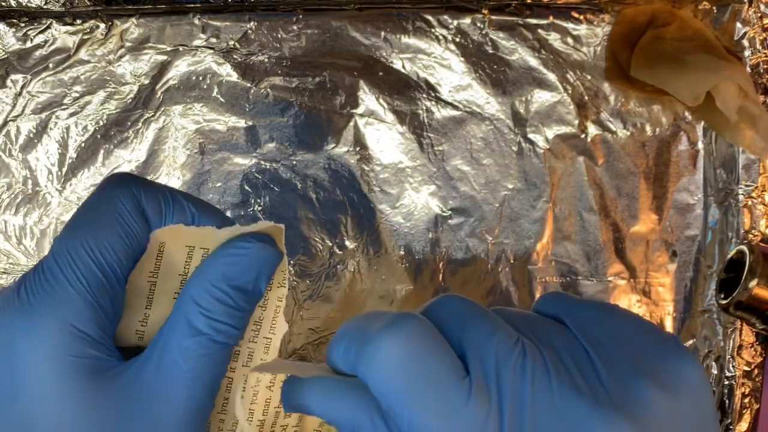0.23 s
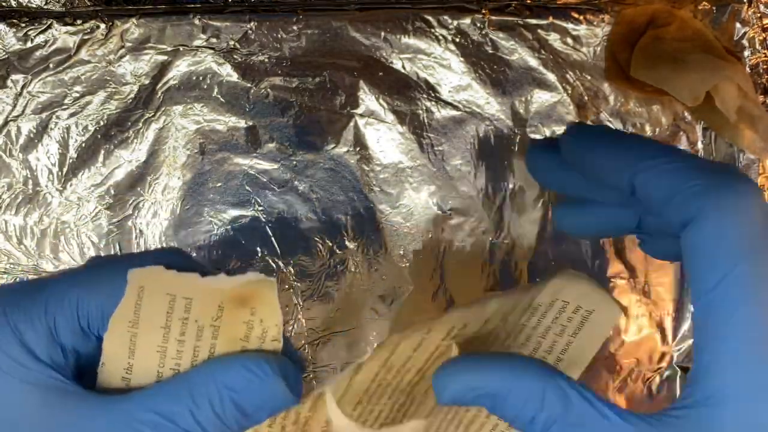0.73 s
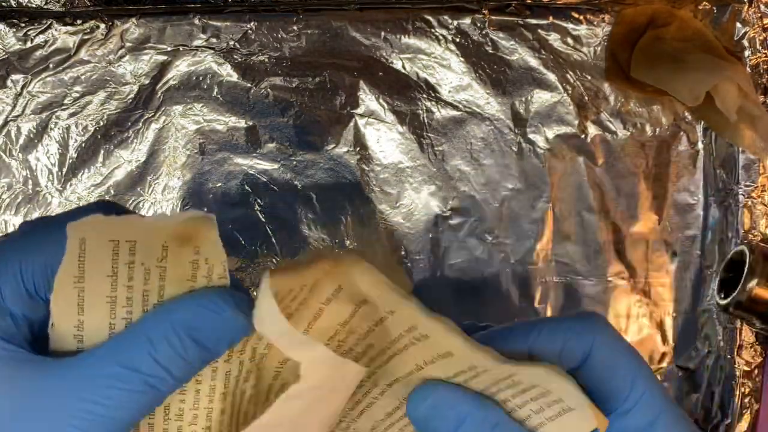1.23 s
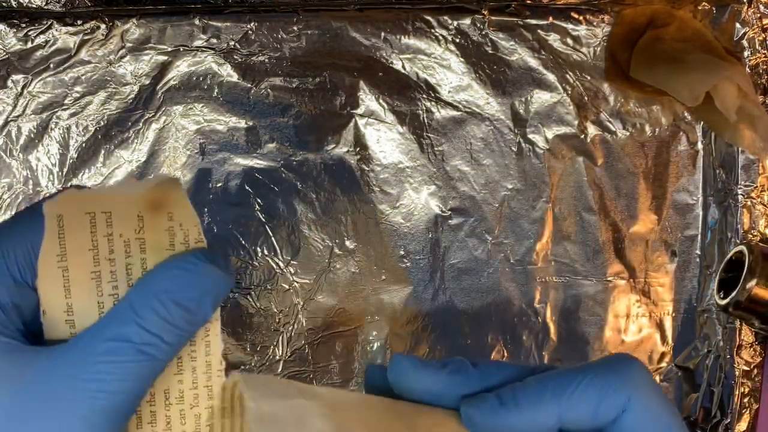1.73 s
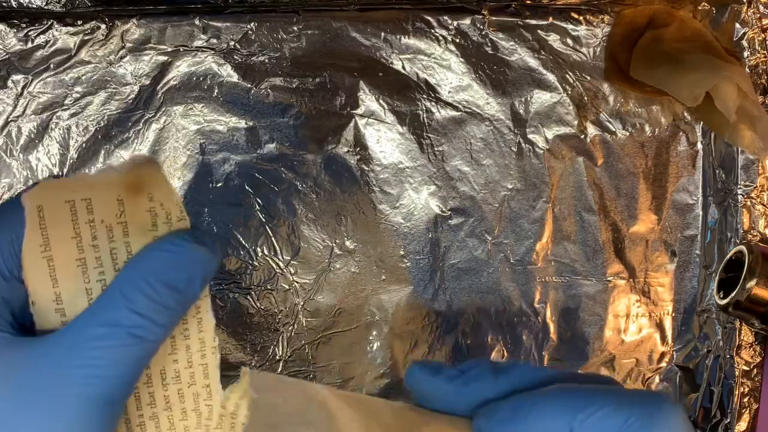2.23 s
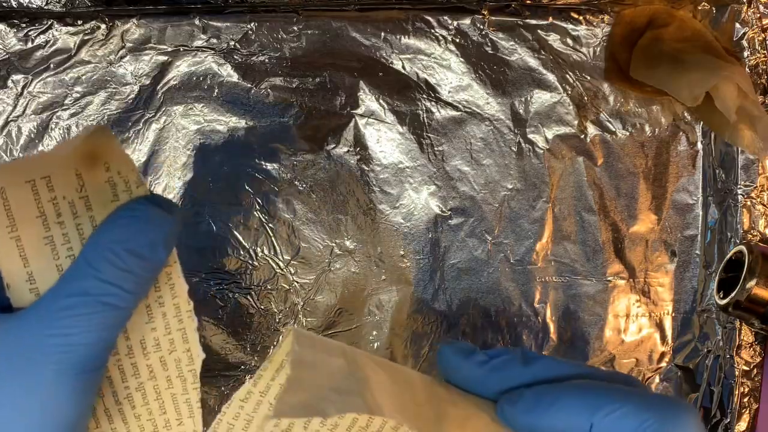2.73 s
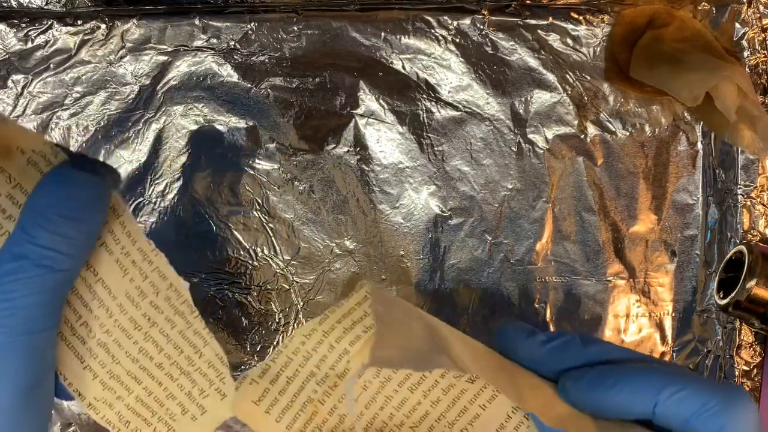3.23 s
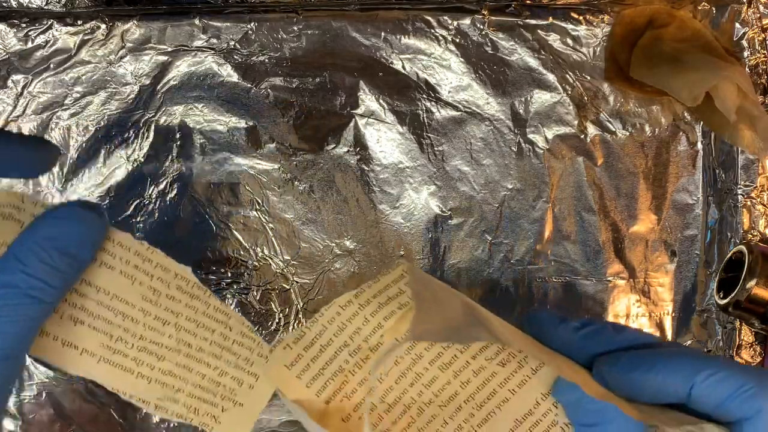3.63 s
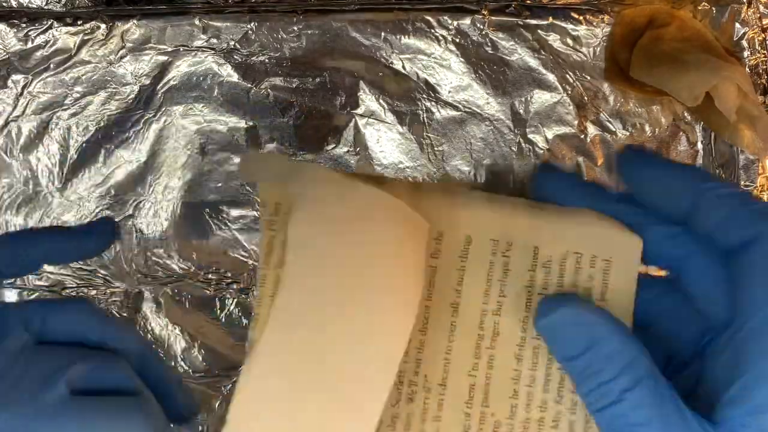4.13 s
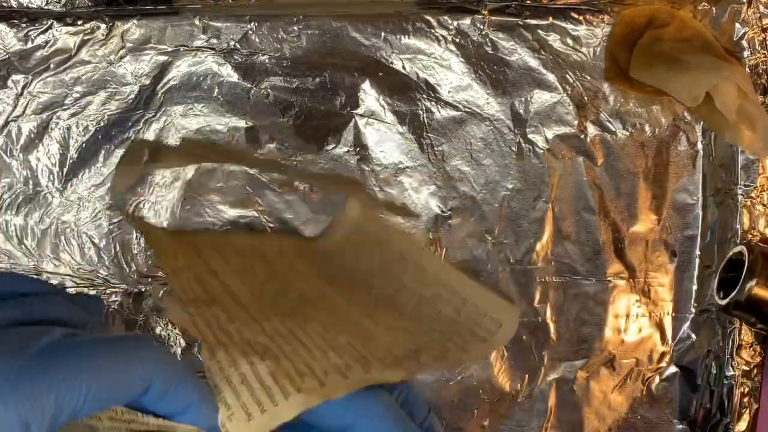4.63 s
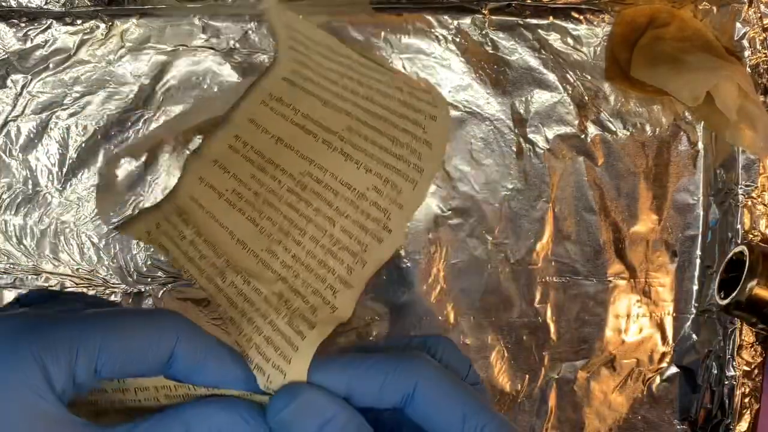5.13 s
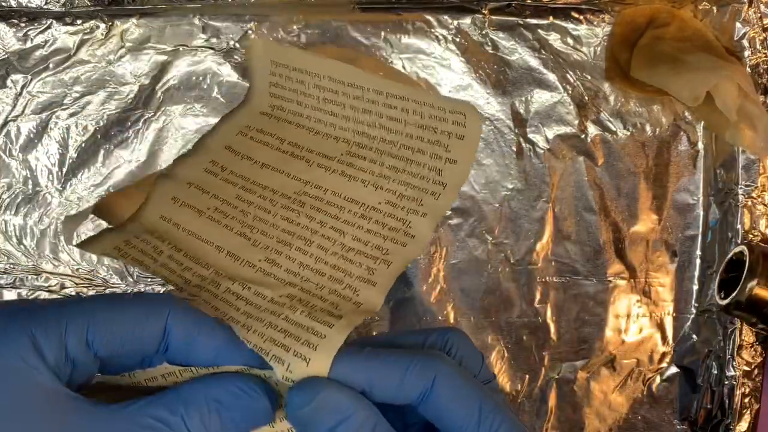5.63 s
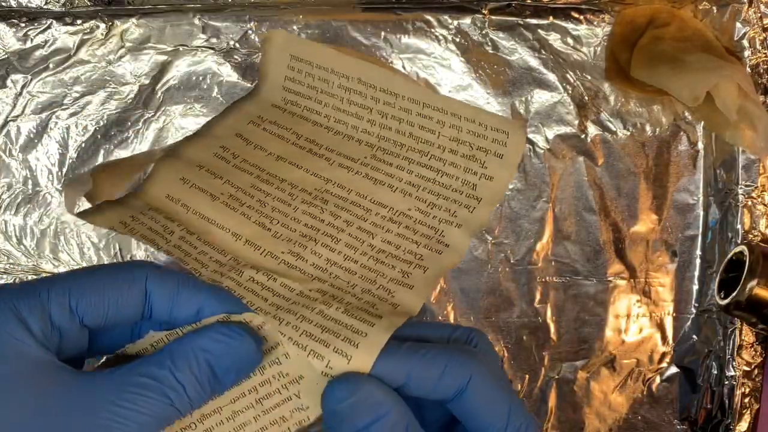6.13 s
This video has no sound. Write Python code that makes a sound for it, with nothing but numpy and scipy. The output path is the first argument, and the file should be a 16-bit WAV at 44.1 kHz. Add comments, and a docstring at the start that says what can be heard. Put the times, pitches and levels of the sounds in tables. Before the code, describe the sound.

Gloved hands tear a brittle old book page close to the microphone in a small quiet room. A short dry rip opens, then busy rustling and crisp snaps of the buckling sheet, with further brief rips between and soft low puffs of moved air. After the page is turned over, activity thins and a quiet, muffled slow tear crackles to the end.

```python
"""A short dry rip opens the scene: gloved hands tear an old book page above a foil-lined tray, close by.
Five such rips are loud bursts of coarse, unclumped grains of breaking fibre; denser, clumpier grains rustle.
Buckling panels snap as noise bursts with two ringing modes, and low filtered noise makes puffs of air.
Near the end the pinched page tears slowly and softly, in sparser grains than the rustle.
The paper sounds in a hollow and a small quiet room; two microphone ports hear it with the air and background."""
import sys
import numpy as np
from scipy import signal
from scipy.fft import rfft, irfft, next_fast_len
from scipy.io import wavfile
from scipy.ndimage import uniform_filter1d

SR = 44100
rng = np.random.default_rng(int(sys.argv[2]) if len(sys.argv) > 2 else 0)


def waveform_to_disk(signal):
    """Save audio, clipped to [-1, 1], as 16-bit WAV at the path in sys.argv[1]."""
    frames = np.transpose(np.atleast_2d(signal))
    scaled = np.clip(frames, -1, 1) * 32767
    samples = np.round(scaled).astype(np.int16)
    wavfile.write(sys.argv[1], SR, samples)


N = 281799

# The sheet buckles, each time in a different panel; levels are relative, ahead of the mix:
# start_s [s], level_db [dB], body_db [dB], sizzle_db [dB], low_mode_hz [Hz], upper_mode_hz [Hz]
BUCKLES = [(.131, -44.5, 7, 0, 695, 1670), (0.1497, -37.5, 7, -17, 415, 1700),
           (0.2168, -29.5, -2.5, -11, 765, 1620), (0.306, -33.5, -14, 5.5, 880, 1660),
           (.332, -11.5, -6, -1, 435, 1810), (0.349, -24.5, 9, 1, 950, 1740),
           (0.441, -34, 4, 5.5, 312, 2580), (0.5257, -21.5, -23, -10, 725, 1730),
           (.545, -26, -5, 7.5, 430, 1740), (0.5799, -18, -14, 8, 940, 2170),
           (0.5927, -19.5, 0.5, -5, 720, 2180), (0.6598, -42, -21, 16, 392, 2200),
           (.865, -58.5, -4, 15.5, 400, 3040), (0.9366, -36.5, -16, 6.5, 300, 3400),
           (1.0114, -43.5, -16, 3, 300, 3020), (1.164, -26, -16, 4.5, 820, 2900),
           (1.185, -13, -1, -3, 786, 1800), (1.205, -21.5, -9, 4, 440, 2950),
           (1.2205, -12, 4, 0, 1170, 2180), (1.3191, -24.5, 11.5, 0, 403, 2900),
           (1.3563, -25, -6.5, 8, 600, 1630), (1.4113, -25.5, -1, 5.5, 750, 1760),
           (1.5364, -50, 18.5, 15, 415, 1710), (1.5589, -42, 16, 7, 355, 1650),
           (1.5893, -32.5, 12, -3, 627, 1580), (1.6055, -38, -10, 12, 640, 3340),
           (1.6295, -36.5, -7, 16, 860, 3430), (1.6546, -18, -5, 10, 1085, 1660),
           (1.6678, -29.5, -11, 16, 930, 2220), (1.7629, -33.5, 5, 8, 427, 1560),
           (1.7967, -26.5, 0, -16, 970, 1700), (1.844, -39.5, 5.5, -0.5, 298, 1770),
           (1.914, -31.5, 5, -6.5, 326, 1870), (1.9631, -34.5, 13.5, -17, 1010, 2960),
           (2.002, -12.5, -2.5, -10, 380, 3090), (2.0313, -26, 6.5, -13, 450, 1720),
           (2.072, -27, 3.5, -4, 427, 1610), (2.092, -18, 1, 0, 445, 1800),
           (2.1598, -17.5, 6, 5.5, 393, 1630), (2.189, -20.5, -4, -6, 428, 1750),
           (2.222, -30, -14, 17, 726, 1860), (2.2492, -28, -3, 8, 380, 2120),
           (2.2753, -25, 10, 12, 463, 2100), (2.3448, -26, 5, -5.5, 930, 1660),
           (2.569, -30, 3.5, 9, 750, 1840), (2.6368, -23.5, 7, 6.5, 308, 1730),
           (2.6606, -21, -2, 5.5, 407, 1680), (2.8048, -38, -4, 10, 300, 1930),
           (2.826, -34, 9.5, 11, 314, 1680), (2.8478, -21.5, -1, -3, 413, 1610),
           (2.8746, -15.5, -1, -1.5, 390, 2000), (2.935, -29, 10.5, -4.5, 863, 1820),
           (2.9926, -39, 10, 16, 930, 3080), (3.1266, -25.5, 1.5, 4, 398, 1870),
           (3.1669, -31, 11.5, 8, 404, 1470), (3.196, -34, 9, 8.5, 395, 2440),
           (3.3294, -49, 6, 8.5, 845, 3100), (3.4431, -19.5, -6, -16, 975, 2140),
           (3.5913, -40.5, 7, -16, 895, 1730), (3.612, -34.5, 6, -17.5, 835, 1920),
           (3.7922, -45.5, 12, 4, 710, 4800), (3.8112, -42, 5, 3.5, 372, 2800),
           (3.86, -42.5, 9, 4.5, 700, 2870), (3.892, -30.5, 10.5, 7, 764, 2640),
           (4.008, -18.5, -8, 1.5, 687, 4140), (4.0344, -19, 0, 5.5, 380, 3920),
           (4.0617, -24, -2.5, -14, 680, 1620), (4.1567, -19, -9, -1, 935, 2060),
           (4.2294, -35, -15, 10.5, 890, 3530), (4.2847, -31, 0, 8, 1130, 3600),
           (4.45, -27, -9.5, 5.5, 677, 1360), (4.5266, -37, 6.5, -19, 700, 1400),
           (4.5458, -14.5, -3, -9.5, 608, 1350), (4.571, -34.5, -11.5, 21, 720, 1850),
           (4.6063, -27, -6, 2, 620, 4670), (4.72, -37, -8, -1.5, 318, 2100),
           (4.8204, -46, 5.5, -14, 630, 1530), (5.1035, -19, 0, -7.5, 960, 2120),
           (5.2381, -45, -10, 2, 960, 2180), (5.364, -48, -18, -12, 915, 2120),
           (5.4183, -37, -8, 2.5, 640, 1880), (5.8307, -37, -8, -15, 966, 1800),
           (6.03, -37, -5, -21, 940, 2120), (6.1166, -42.5, 13, 16.5, 674, 1730)]


def gain_of(db):
    """Decibels to amplitude."""
    return 10 ** (np.asarray(db) / 20)


def evened(x):
    """Scales to rms 1."""
    return x / np.sqrt(np.mean(x ** 2) + 1e-20)


def read(points, hz, axis=1):
    """One column of a table, joined by straight lines over log frequency."""
    columns = np.transpose(points)
    return np.interp(np.log(hz + 1), np.log(columns[0] + 1), columns[axis])


def add(mix, s, sound):
    """Lays a two-channel sound into the mix at time s."""
    part = mix[:, max(round(s * SR), 0):][:, :sound.shape[1]]
    part += sound[:, :part.shape[1]]


def spectrum(x):
    """Frequencies and padded spectrum of a sound."""
    size = 2 * next_fast_len(x.shape[-1] // 2 + 2048)
    return np.fft.rfftfreq(size, 1 / SR), rfft(x, size)


def registers(colour, hz, body_hz=750):
    """A colour split into three filters: body of the sheet, crackle, sizzle."""
    body = read([(body_hz, 1), (body_hz * np.sqrt(3), 0)], hz)
    sizzle = read([(4500, 0), (8000, 1)], hz)
    crackle = 1 - body - sizzle
    return np.array([body, crackle, sizzle]) * gain_of(read(colour, hz))


def coloured_noise(colour):
    """Two unrelated steady noises of one colour."""
    hz, z = spectrum(rng.standard_normal((2, N)))
    return evened(irfft(z * gain_of(read(colour, hz)))[:, :N])


def movement(s, swell_s, fade_s, hold_s=0, roundness=1.283):
    """Gain of one movement: it swells by 20 dB up to time s, holds, and fades by 20 dB."""
    swell_s, fade_s = max(swell_s, 1e-3), max(fade_s, 1e-3)
    first = max(round((s - 3 * swell_s) * SR), 0)
    last = min(round((s + hold_s + 3 * fade_s) * SR), N)
    near = np.arange(first, last)
    t = near / SR - s
    # distance from the held part, counted in swells or fades
    away = np.maximum(-t / swell_s, 0) + np.maximum((t - hold_s) / fade_s, 0)
    gain = np.zeros(N)
    gain[near] = gain_of(-20 * away ** roundness)
    return gain


def fibres(per_s, spread_db, ring_t60, clump_db, count=12):
    """Tiny breaks and slips of very unequal size, in clumps; each rings one patch of the sheet."""
    size = gain_of(spread_db * np.minimum(rng.exponential(1, N), 4.5))
    size *= rng.random(N) < per_s / SR
    clumps = evened(uniform_filter1d(rng.standard_normal(N), size=260))
    size *= gain_of(clump_db * clumps)
    patch = rng.integers(0, count, N)
    t = np.arange(1024) / SR
    # a short crack with the weaker ring of the patch
    decay = np.exp(-t / 0.00055) + 0.74 * gain_of(-60 * t / ring_t60)
    rings = rng.standard_normal((count, 2, len(t))) * decay
    out = np.zeros((2, N))
    for k in range(count):
        hits = (size * (patch == k))[None]
        out += signal.oaconvolve(hits, rings[k], axes=1)[:, :N]
    # the hand, not chance, sets the force over longer stretches
    power = uniform_filter1d((out ** 2).mean(0), size=1500)
    return out / np.sqrt(abs(power) + 1e-9)


def flexing(x, patchy_db, patch_hz, patch_s, size=512):
    """As the sheet bends its resonances come and go in patches of time and pitch."""
    overlap = size * 3 // 4
    hz, t, z = signal.stft(x, SR, nperseg=size, noverlap=overlap)
    field = rng.standard_normal(z.shape[1:])
    for _ in range(2):
        field = uniform_filter1d(field, max(round(patch_hz / hz[1]), 1), axis=0)
        field = uniform_filter1d(field, max(round(patch_s / t[1]), 1), axis=1)
    # the patches are milder in the body of the sheet
    depth = read([(300, 0.09), (1500, 1)], hz)[:, None]
    gain = evened(gain_of(patchy_db * evened(field) * depth))
    return signal.istft(z * gain, SR, nperseg=size, noverlap=overlap)[1][:, :N]


def stroke(moves, colour, grains, body_hz=750):
    """Grains radiate through the sheet; the grip of each move (gain, level, body, sizzle) sets its colour."""
    power = np.zeros((3, N))
    for gain, level_db, body_db, sizzle_db in moves:
        on = gain > 0
        balance = gain_of([[body_db], [0], [sizzle_db]])
        power[:, on] += (gain[on] * gain_of(level_db) * balance) ** 2
    hz, z = spectrum(grains)
    bands = registers(colour, hz, body_hz)
    return sum(np.sqrt(p) * irfft(z * band)[:, :N] for p, band in zip(power, bands))


def background():
    """The quiet room itself: steady faint noise of one colour."""
    # background colour: pitch_hz [Hz], level_db [dB]
    colour = [(18, -33), (30, 12.5), (921, -10.5), (1260, -0.5), (2070, 9), (6720, -15.5), (8500, -34.5),
              (10200, -27), (13300, -31), (15500, -18.5)]
    return gain_of(-83.5) * coloured_noise(colour)


def rips():
    """The tear front runs through the fibres in short pulls."""
    # tear runs, ahead of the mix: start_s [s], length_s [s], level_db [dB], body_db [dB], sizzle_db [dB]
    runs = [(0.0, 0.029, -27.5, -4.5, -4.5), (1.676, 0.057, -20.5, -2.5, -4), (2.161, 0.14, -28, 2, -2.5),
            (2.599, 0.055, -30, 2.5, -1.5), (3.063, 0.097, -32, 0.5, -.5)]
    # colour of tearing: pitch_hz [Hz], level_db [dB]
    colour = [(25, -31), (60, -20), (150, -7.5), (250, -1), (400, 6), (520, 1), (750, 3.5), (1200, -9),
              (1750, 2.5), (2400, -3), (3000, -0.8), (5000, -3.3), (6500, -3), (9000, 5), (14000, 1.5)]
    attack_s, release_s = 0.032, 0.036
    grains = fibres(per_s=2400, spread_db=4.0, ring_t60=0.031, clump_db=0.0)
    grains = flexing(grains, patchy_db=2.5, patch_hz=380, patch_s=.012)
    moves = ((movement(s, attack_s, release_s, length), *grip) for s, length, *grip in runs)
    return stroke(moves, colour, grains)


def puffs():
    """Air pushed by the moving page: soft low noise swelling over a draught that never quite rests."""
    # puffs of air: strongest_s [s], swell_s [s], fade_s [s], level_db [dB, ahead of the mix]
    gusts = [(.2, 0.17, 0.18, -65), (.375, .07, 0.066, -46), (.51, 0.037, 0.043, -48),
             (.6, 0.046, .08, -51), (1.24, 0.25, 0.076, -57), (1.32, .04, 0.1, -57), (1.71, .15, 0.2, -61),
             (2.175, 0.022, .08, -44), (2.29, .08, 0.091, -46), (2.63, 0.25, 0.18, -59),
             (2.91, 0.062, 0.38, -58.5), (3.18, .12, 0.064, -60), (3.81, .04, 0.048, -56),
             (3.91, 0.15, 0.043, -52.5), (4.11, 0.18, 0.21, -55.5), (4.57, 0.14, 0.12, -49.5)]
    # colour of moving air: pitch_hz [Hz], level_db [dB]
    colour = [(20, -54), (32, -37.5), (42, -15), (57, -1), (100, -9.5), (150, -10), (300, -21.5),
              (900, -75)]
    draught_db = -70.5  # ahead of the mix
    power = sum((gain_of(db) * movement(s, swell, fade)) ** 2 for s, swell, fade, db in gusts)
    return np.sqrt(power + gain_of(draught_db) ** 2) * coloured_noise(colour)


def rustle():
    """Creases give way and paper brushes paper; a brief thin rustle swells and fades around each snap."""
    # the page is bent, pulled and turned over, one brush a row, ahead of the mix:
    # strongest_s [s], swell_s [s], fade_s [s], level_db [dB], body_db [dB], sizzle_db [dB]
    brush_rows = [(.11, 0.087, 0.091, -49, 7.5, -7), (0.243, 0.059, 0.14, -34, -3.5, -3.5),
                  (0.376, 0.075, 0.013, -38.5, 15, -12), (.455, 0.098, .04, -36, -3, -0.5),
                  (0.511, 0.051, 0.064, -25, 0, -4.5), (0.612, 0.051, 0.017, -27, 2.5, -16),
                  (.675, 0.027, 0.043, -32.5, -0.5, -2.5), (.762, .016, 0.051, -37, -8.5, 4.5),
                  (.82, 0.026, 0.027, -52.5, 5.5, 10), (.942, 0.017, .05, -41, 2, -2),
                  (1.04, 0.037, 0.027, -50, -6, -4), (1.12, 0.045, 0.18, -39, -9.5, -2.5),
                  (1.201, 0.055, .1, -26, 2.5, -11), (1.327, 0.071, 0.097, -31, 0.5, 4),
                  (1.441, 0.031, 0.088, -27, -6, 1.5), (1.64, 0.071, .06, -37, -5.5, 7.5),
                  (1.81, 0.051, 0.24, -48.5, 4, -8), (2.04, 0.049, 0.15, -40.5, 1, 3),
                  (2.105, .03, 0.035, -36.5, 2.5, 6), (2.15, 0.034, 0.038, -29.5, 7.5, -5),
                  (2.33, 0.059, 0.073, -39.5, 6.5, -13), (2.452, 0.039, 0.14, -35, 4, -8),
                  (2.52, 0.049, 0.07, -50.5, 14, 2), (2.74, 0.089, 0.096, -48, 5, -2),
                  (2.85, 0.1, 0.4, -38, 4, -2), (3.02, 0.093, 0.11, -39, 0.5, 4),
                  (3.22, 0.05, 0.056, -42.5, 7, -4.5), (3.375, 0.072, 0.12, -44, -2.5, -8.5),
                  (3.462, 0.18, 0.29, -41.5, -5.5, -3), (3.635, 0.12, 0.16, -43.5, -1.5, 2),
                  (3.82, 0.048, 0.012, -43.5, -5, -2), (3.915, 0.019, 0.025, -38, -7.5, 2.5),
                  (4.0, 0.054, 0.058, -35, 2.5, 2.5), (4.07, 0.093, 0.021, -27, -1.5, -2),
                  (4.11, 0.041, 0.092, -35, -6, 2.5), (4.164, 0.051, 0.06, -36.5, 2.5, -3),
                  (4.252, 0.049, 0.024, -38.5, 0.5, 3), (4.303, 0.035, 0.11, -31.5, -12.5, 3),
                  (4.48, .03, 0.07, -40.5, -3.5, -4.5), (4.633, 0.11, 0.062, -30, -4, -1),
                  (4.851, 0.18, 0.1, -47.5, -1, 0.5), (4.962, 0.01, 0.041, -54.5, 4, 4.5),
                  (5.039, 0.059, 0.047, -48, -7.5, 5.5), (5.124, 0.059, 0.11, -39, -18, -0.5),
                  (5.31, 0.081, 0.24, -58, -7, -2), (6.385, 0.044, .05, -61.5, -5, 6)]
    # colour of rustling: pitch_hz [Hz], level_db [dB]
    colour = [(25, -40), (60, -14.5), (150, -3.2), (300, 6), (450, 2), (650, 4), (900, -2), (1250, -7),
              (1750, 1.5), (2600, -4.5), (3500, -2.5), (5500, -4.5), (9000, -3), (12000, -2), (14500, -5.5)]
    # the brief rustle around a snap: swell and fade time, and levels relative to the snap's row
    lead_s, lead_db, lead_body_db = 0.0084, -16.5, -9.5
    grains = fibres(per_s=4500, spread_db=2.5, ring_t60=0.028, clump_db=3.0)
    grains = flexing(grains, patchy_db=5.0, patch_hz=260, patch_s=.035)
    moves = [(movement(s, swell, fade), *grip) for s, swell, fade, *grip in brush_rows]
    for s, level_db, body_db, sizzle_db, *_ in BUCKLES:
        lead_rustle = movement(s, lead_s, lead_s)
        moves.append((lead_rustle, level_db + lead_db, body_db + lead_body_db, sizzle_db))
    return stroke(moves, colour, grains)


def snap(level_db, body_db, sizzle_db, low_hz, upper_hz, mode_db, t60, crack=0.43, size=6144):
    """A panel flips: the treble cracks at once, slow bending waves bring the body later, and two modes ring."""
    # colour of a snap: pitch_hz [Hz], level_db [dB]
    colour = [(60, -21.5), (150, -13.5), (300, -1.5), (450, -2.5), (800, -1.2), (1100, -6.5), (1600, 1.5),
              (2300, -0.76), (3200, -0.7), (5500, -2.5), (9000, -1), (14500, -10)]
    t, hz = np.arange(size) / SR, np.fft.rfftfreq(size, 1 / SR)
    bands = registers(colour, hz) * gain_of([[body_db], [0], [sizzle_db]])
    # a panel radiates little far below its low mode
    bands = bands * hz ** 2 / np.hypot(hz ** 2, (0.35 * low_hz) ** 2)
    out = np.zeros((2, size))
    rises_s = (.0022, .0003, .00015)  # body, crackle, sizzle
    ring_t60s = (0.72 * t60, t60, 0.52 * t60)
    for band, rise_s, ring_t60 in zip(bands, rises_s, ring_t60s):
        fall = gain_of(-60 * t / ring_t60) + crack * np.exp(-t / 0.00013)
        noise = irfft(rfft(rng.standard_normal((2, size))) * band)
        burst = (1 - np.exp(-t / rise_s)) * fall * noise
        out += np.sqrt(np.mean(band ** 2)) * evened(burst)
    for mode_hz, width_hz in (low_hz, 110), (upper_hz, 170):
        # the power that lifts a peak of this width above the burst
        lift = gain_of(max(mode_db, 0)) ** 2 - 1
        power = lift * np.interp(mode_hz, hz, bands.sum(0)) ** 2 * np.pi * width_hz / SR
        tone = np.sin(2 * np.pi * (mode_hz * t + rng.random((2, 1))))
        ring = tone * np.exp(-np.pi * width_hz * t)
        out += np.sqrt(power) * evened(ring * (1 - np.exp(-t * mode_hz / 2)))
    decay = gain_of(-60 * t / t60)
    return gain_of(level_db) * np.sqrt(np.mean(decay ** 2)) * out


def snaps():
    """Every buckle of the sheet at its moment: weak ones die more slowly, dull ones ring more clearly."""
    # decay at the firm level, and how many dB weaker a snap must be to last twice as long
    firm_db, firm_t60_s, doubling_db = -16, 0.051, 27
    # how far both modes stand out [dB], and how much more for each dB of sizzle that a snap lacks
    base_mode_db, dull_ring = 7, 0.33
    out = np.zeros((2, N))
    for s, level_db, body_db, sizzle_db, low_hz, upper_hz in BUCKLES:
        t60 = firm_t60_s * 2 ** ((firm_db - level_db) / doubling_db)
        mode_db = base_mode_db + dull_ring * max(-sizzle_db, 0)
        add(out, s, snap(level_db, body_db, sizzle_db, low_hz, upper_hz, mode_db, t60))
    return out


def slow_tear():
    """Fibres part a few at a time, muffled by the fingers."""
    # the pinched page tears, one pull a row, ahead of the mix:
    # strongest_s [s], swell_s [s], fade_s [s], level_db [dB], body_db [dB], sizzle_db [dB]
    pulls = [(5.37, 0.019, 0.064, -49, -15, 4.5), (5.465, 0.042, 0.082, -38, -17.5, 4),
             (5.517, 0.026, 0.043, -37.5, -4.5, -14), (5.61, 0.012, 0.033, -44, -10, -2),
             (5.647, 0.062, 0.066, -34.5, -9, -4), (5.775, 0.094, .05, -51.5, -8, 3),
             (5.834, .08, 0.11, -33, -8, -2.5), (6.015, 0.13, 0.14, -38.5, 0.5, -1.5),
             (6.11, 0.13, 0.048, -38, 7.5, -1.5), (6.282, 0.058, 0.062, -53, -7.5, -8.5)]
    # colour shaped by the cupped hands: pitch_hz [Hz], level_db [dB]
    colour = [(60, -18), (170, -13.5), (250, -4), (370, 3), (620, 0.5), (950, -1), (1350, -18.5),
              (1750, 4.5), (2200, 5.5), (2700, -15), (3200, 0.5), (3750, -5.5), (4400, -2.5), (5500, -4),
              (6800, 0), (12000, 0), (14500, 1)]
    grains = fibres(per_s=3000, spread_db=3.5, ring_t60=0.027, clump_db=1.0)
    grains = flexing(grains, patchy_db=4.0, patch_hz=260, patch_s=0.017)
    moves = ((movement(s, swell, fade), *grip) for s, swell, fade, *grip in pulls)
    return stroke(moves, colour, grains, body_hz=530)


def hollow(x):
    """The space between hands, page and tray favours a few pitches and weakens one."""
    # resonances of the hollow: centre_hz [Hz], width_hz [Hz], level_db [dB]
    resonances = [(423, 15, 5.5), (497, 28, -8), (921, 100, 7), (1680, 17, 4), (2970, 28, 5.5)]
    hz, z = spectrum(x)
    for centre_hz, width_hz, db in resonances:
        z = z * (1 + (gain_of(db) - 1) / (1 + 2j * (hz - centre_hz) / width_hz))
    return irfft(z)[:, :N]


def room(x):
    """A short diffuse tail, made of decaying noise, whose highest treble dies first."""
    # reverberation: pitch_hz [Hz], t60_s [s]
    decay_times = [(200, 0.14), (1500, 0.11), (6000, 0.16), (15000, 0.04)]
    late = np.arange(SR // 2) > .007 * SR  # the tail waits 7 ms
    taps = rng.standard_normal((2, SR // 2)) * late
    hz, t, z = signal.stft(taps, SR, nperseg=256)
    decay = gain_of(-60 * t / read(decay_times, hz)[:, None])
    tail = signal.istft(z * decay, SR)[1]
    return signal.fftconvolve(x, tail / np.linalg.norm(tail[0]), axes=1)[:, :N]


def ports(x):
    """Both microphone ports share part of the sound, in or out of step depending on frequency."""
    # pitch_hz [Hz], coherence [0-1], left_phase_lead [rad], left_minus_right_db [dB]
    pair = [(350, 0.96, 0.19, 1.0), (1000, 0.89, 0.27, 2.0), (1700, 0.8, 0.02, 0.4),
            (2400, 0.52, 0.82, -0.4), (3100, 0.62, 1.67, -1.8), (4000, 0.25, 1.45, -1.2),
            (4800, 0.16, 1.67, -2.3), (5400, 0.28, 2.72, -4.1), (6000, 0.25, 0.14, -2.6),
            (6700, 0.6, -0.75, -0.2), (7400, 0.65, -1.86, 0.4), (8150, 0.97, -3.06, 0.2),
            (8900, 0.96, -3.28, 0.2), (9700, 0.61, -4.69, 0.1), (10400, 0.87, -6.08, 0.5),
            (11600, 0.94, -6.38, 0.4), (12200, 0.64, -8.03, 0.8), (12900, 0.95, -9.35, -0.2),
            (13900, 0.92, -9.52, 0.1), (14500, 0.41, -10.97, -0.3), (15200, 0.88, -12.47, 0.1)]
    hz, (shared, apart) = spectrum(x)
    same = np.clip(read(pair, hz, axis=1), 0, 1)
    shared = shared * np.sqrt((1 + same) / 2)
    apart = apart * np.sqrt((1 - same) / 2)
    # half of the phase and level difference goes to each side
    lean = np.exp(.5j * read(pair, hz, axis=2)) * gain_of(read(pair, hz, axis=3) / 2)
    return irfft(np.array([(shared + apart) * lean, (shared - apart) / lean]))[:, :N]


def scene():
    """Paper, its room, the moving air and the quiet background at the two ports."""
    tearing = gain_of(-0.42) * rips() + gain_of(-0.63) * slow_tear()
    handling = gain_of(-0.17) * rustle() + gain_of(-1.66) * snaps()
    paper = hollow(tearing + handling)
    air = gain_of(-0.5) * puffs()
    return ports(paper + gain_of(-15.0) * room(paper) + air + background())


def record(dry):
    """The recorder's band limit: a steep low-pass."""
    edge_hz = 15900
    low_pass = signal.firwin(511, edge_hz, window=("kaiser", 9), fs=SR)
    return signal.oaconvolve(dry, low_pass[None], "same")


dry = scene()
out = record(dry)
waveform_to_disk(out)
```